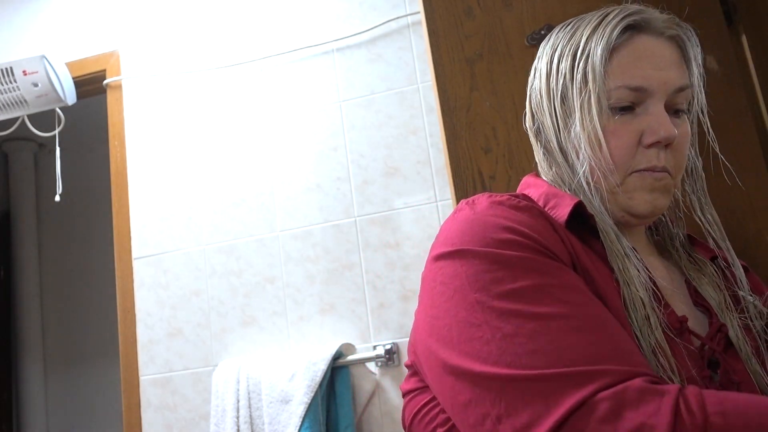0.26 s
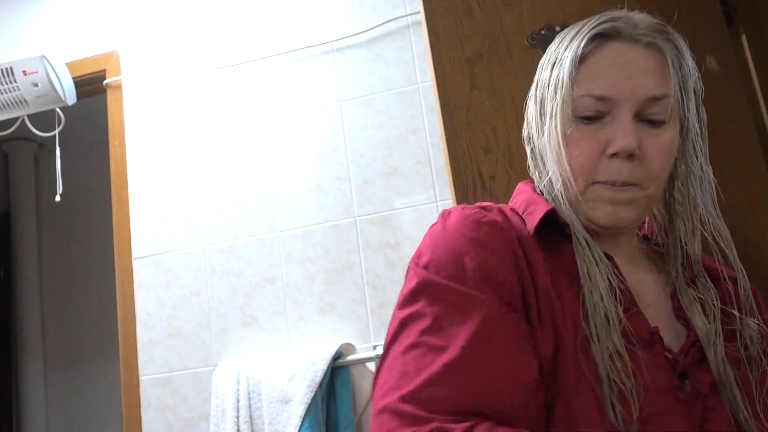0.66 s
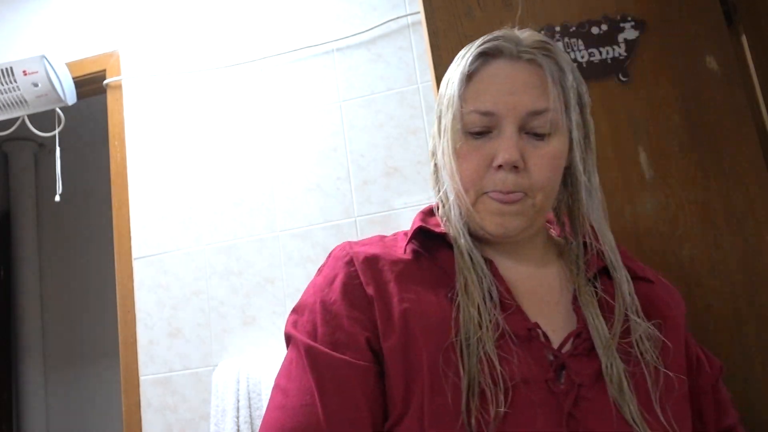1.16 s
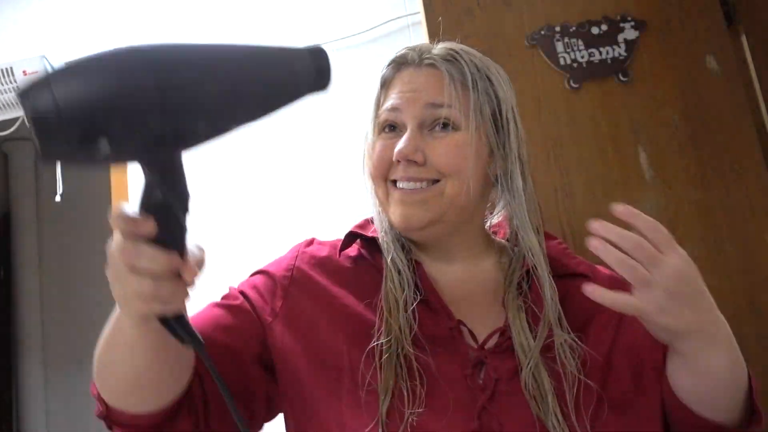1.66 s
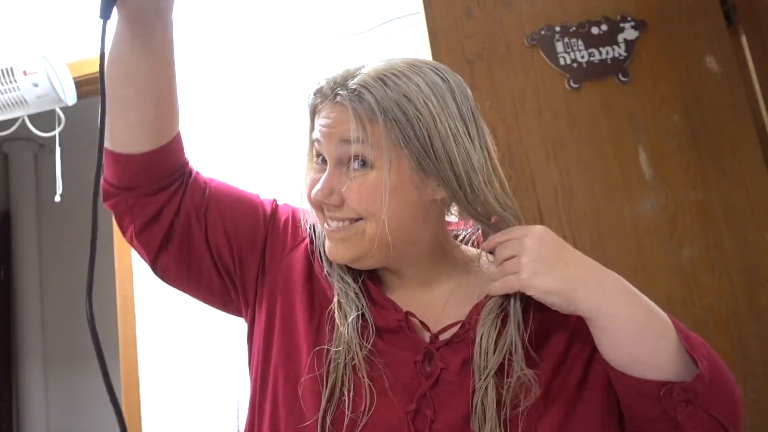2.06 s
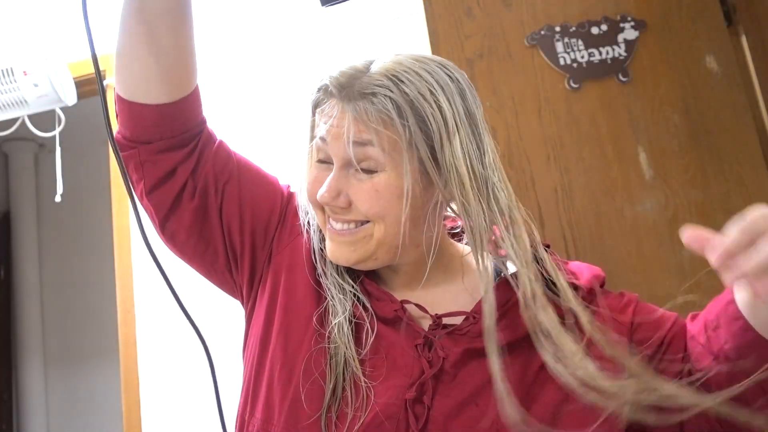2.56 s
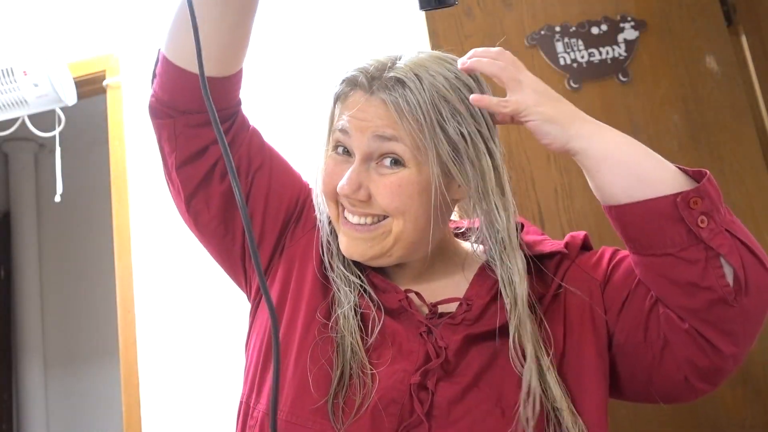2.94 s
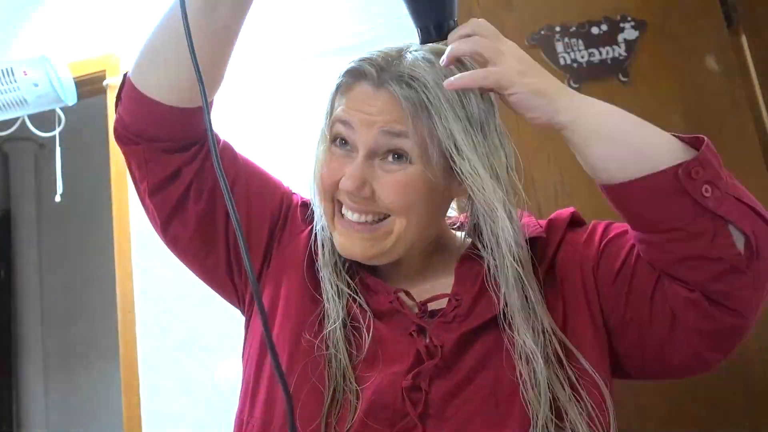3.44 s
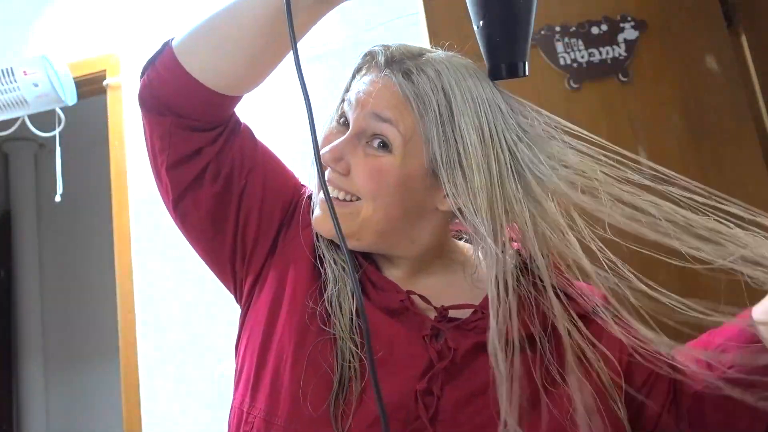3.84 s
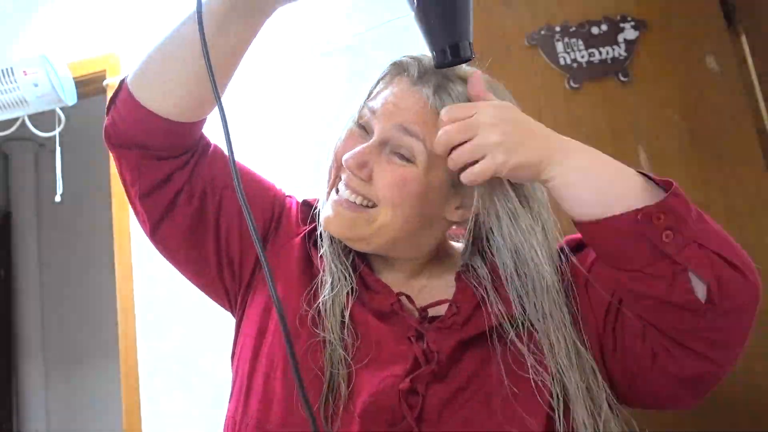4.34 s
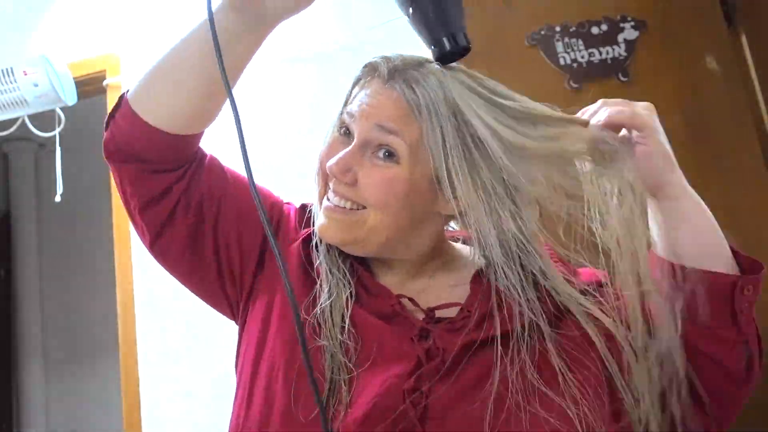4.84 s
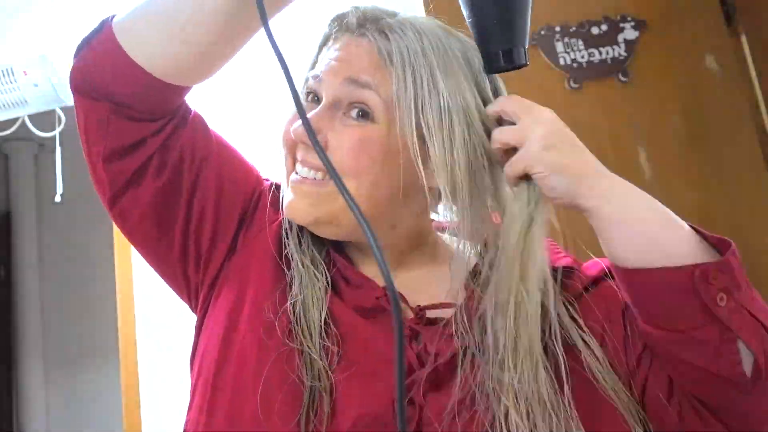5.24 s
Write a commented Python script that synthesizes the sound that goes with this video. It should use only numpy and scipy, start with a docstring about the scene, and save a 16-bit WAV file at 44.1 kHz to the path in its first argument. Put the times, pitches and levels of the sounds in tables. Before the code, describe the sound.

Close stereo pickup in a small tiled bathroom. Faint ticks and plastic knocks, slightly right, lead through cord rustle to a hard clunk and a sharp switch snap. A hair dryer surges to a loud, full roar, its colour shifting as it moves, then volume falls abruptly midway and the steady blowing continues quieter to the end.

```python
"""Ticks, knocks and cord rustle, then a snap and a rising roar: a hand takes a hair dryer off a shelf
in a small tiled bathroom, switches it on, swings it overhead and holds it there. Midway the volume is turned down.
Roar, barrel and jet are shaped stereo noise growing with fan speed and lifted by narrow resonances;
motor and whines are wavering sines; knocks and snap are damped modes, ticks are noise puffs, all with a tile tail.
The microphone has two ports, left and right; the shelf stands to the right."""
import sys
import numpy as np
from scipy import signal
from scipy.fft import rfft, irfft, next_fast_len
from scipy.io import wavfile
from scipy.ndimage import uniform_filter1d, map_coordinates

SR = 44100
rng = np.random.default_rng(int(sys.argv[2]) if len(sys.argv) > 2 else 0)


def pcm_store(signal):
    """Save signal as 16-bit PCM."""
    levels = np.round(np.clip(np.atleast_2d(signal), -1, 1) * 32767)
    wavfile.write(sys.argv[1], SR, levels.astype(np.int16).T)


N = 242550  # 5.5 s

# Quiet room and preamp: [f/Hz, density/dB per Hz]
AIR_SPECTRUM = [(24, -68), (60, -56), (100, -31), (200, -25), (330, -16), (450, -16), (600, -12),
                (1200, -14), (2000, -15), (2300, -9), (2700, -11), (5400, -20.5), (16000, -22.5)]
# Faint low tone of the room: [t/s, level/dB]
DRONE_LEVEL = [(0, -70), (0.55, -71), (0.64, -74), (.72, -95)]
# Cord and sleeve rubbing: [t/s, level/dB]
RUB_LEVEL = [(0, -74), (.5, -68.5), (.6, -62), (.66, -56.5), (.68, -51.5), (.72, -50), (.76, -50),
             (.79, -47), (.84, -51.5), (.865, -48.5), (.91, -52.5), (.941, -52), (.947, -50), (.975, -36.5),
             (1.06, -55), (1.1, -52), (1.115, -50), (1.17, -53.5), (1.24, -51), (1.3, -43)]
# Colour of the rub and of its bright swish: [f/Hz, density/dB per Hz]
RUB_SPECTRUM = [(59, -75), (100, -38), (257, -0.5), (705, 1), (768, 4), (896, 5), (1060, 2.5), (2420, 6.5),
                (6000, -8.5), (7800, -45), (13200, -120)]
SWISH_SPECTRUM = [(2650, -12.5), (4500, -15), (6520, -4), (8460, -4.5), (11000, -6), (16000, -12)]
# Knocks of the casing, level before the room: [t/s, peak level/dB, favoured f/Hz, free ringing/0-1]
KNOCKS = [(.337, -32.5, 1020, 0.27), (.341, -38, 1110, 0.17), (0.3584, -47, 1400, .3),
          (.426, -45, 1020, 0.5), (.574, -49.5, 1130, 0.4), (.602, -53, 1200, 0.5), (.6695, -36, 940, 0.8),
          (.684, -33, 845, .8), (0.696, -39, 1200, 0.7), (0.6722, -39, 1600, 0.4), (0.778, -47, 950, 1),
          (0.858, -45, 1500, 0.6), (.877, -52, 800, 0.4), (0.971, -20, 720, 1), (0.9747, -21, 1310, 0.5),
          (0.9829, -22, 750, 0.4), (0.994, -30, 800, 0.97), (1.106, -41.5, 740, 0.6),
          (1.2503, -26, 745, .12)]
# Modes of the casing: [f/Hz, level/dB, t60/s]
CASING_MODES = [(260, -14, .1), (450, 0, .11), (545, 0, .11), (790, -8, .05), (980, -6, .045),
                (1130, -7, .05), (1260, -4, .05), (1480, -10, .04), (1780, -9, .035), (2200, -9, .03),
                (2900, -13, .03)]
# Dry ticks and scrapes, level before the room: [t/s, level/dB, centre f/Hz, width/octaves, decay/s]
TICKS = [(0.108, -51.5, 2980, 0.69, .0092), (.125, -58, 3000, 0.57, 0.015),
         (0.2627, -41, 10000, 1.4, 0.0025), (.354, -43.5, 10000, 4.1, 0.0031),
         (.3887, -42, 10000, 2, 0.0022), (.786, -50, 1500, .8, .003), (.8564, -48, 10800, 0.47, .004),
         (.857, -50, 2490, 0.36, .005), (.879, -54, 2200, 0.65, .003), (.923, -46, 2400, 0.36, .003),
         (0.943, -38, 3000, 0.94, 0.0045), (0.958, -33, 2780, 0.72, 0.0059),
         (0.971, -33, 2370, 0.61, 0.0089), (1.187, -53, 9000, 1.2, 0.052), (1.216, -56, 2000, .6, .003),
         (1.25, -28.5, 5200, 0.88, 0.0028)]
# The snap and the rocker's rebounds: [delay/s, level/dB relative to the switch, favoured f/Hz]
SNAPS = [(.0012, 0, 2200), (.0038, -13, 1500), (.0064, -7, 1550), (.0098, -12, 1550), (.0119, -9, 1450),
         (.0168, -12, 1550)]
# Modes of the switch rocker: [f/Hz, level/dB, t60/s]
ROCKER_MODES = [(1150, -3, .007), (1620, -6, .0055), (2020, 0, .0045), (2350, -6, .004), (3200, -12, .004)]
# Dying away of the tiled walls: [f/Hz, t60/s]
TILE_DECAY = [(200, 0.13), (1500, 0.17), (6000, 0.15), (15000, 0.11)]
# Low motor tones: [peak t/s, f/Hz, peak level/dB, rise/s, t60/s]
GROANS = [(1.29, 115, -50.5, 0.022, 0.34), (1.29, 198, -47, 0.023, 0.22), (1.72, 196.4, -49.5, 0.37, 0.71),
          (3.22, 118, -52, 0.11, 0.47)]
# Thin fan whines: [from t/s, to t/s, f/Hz, level/dB before the volume step]
WHINES = [(3.1, 5.2, 1768, -36), (3.3, 5.6, 2005, -33), (3.9, 4.8, 2190, -42), (4.85, 5.577, 2685, -42)]
# Colour of the dryer's air noise in three ranges: [f/Hz, density/dB per Hz]
ROAR_SPECTRUM = [(15, -80), (25, -58), (69, -54.5), (200, -32), (314, -23), (428, -5.5), (515, -4),
                 (620, -3.5), (900, -2), (1000, -16), (1300, -48), (2200, -120)]
BARREL_SPECTRUM = [(560, -47), (950, -6), (1170, -7), (1680, -4.5), (2020, -5), (2470, -4), (2700, -4.5),
                   (3090, -7.5), (4800, -17.5), (6240, -26), (10600, -120)]
JET_SPECTRUM = [(2650, -31.5), (4500, -1), (6090, -3), (10300, -3), (11600, -7.5), (15100, -13),
                (16000, -12)]
# Room and barrel resonances at each place, negative lifts are dips: [f/Hz, width/Hz, lift/dB]
SWUNG_MODES = [(200, 10, 3), (505, 230, 0.5), (710, 24, 6.5), (797, 37, 12), (1020, 62, 5.5), (1363, 43, 8),
               (1790, 200, -0.5), (2065, 110, 9), (2450, 61, -4), (2760, 120, 6.5), (3940, 160, 6.5),
               (5640, 6800, 4.5)]
OVERHEAD_MODES = [(266, 114, -10), (505, 26, 6.5), (548, 26, -3.5), (604, 26, 5), (893, 30, 9.5),
                  (1062, 48, 3), (1189, 87, 7), (1363, 51, 8.5), (1520, 11, 9), (1670, 50, -6),
                  (1812, 19, 7), (1980, 23, 5), (2053, 19, 12), (2420, 74, -8), (2540, 94, -4.5),
                  (2653, 50, 7), (2790, 140, 0), (3330, 190, 3), (3600, 50, 6), (3880, 190, 6.5),
                  (4170, 130, 5.5)]
HELD_MODES = [(115, 48, 11.5), (199, 160, 5.5), (412, 12, 5), (529, 49, 8), (557.4, 20.4, -12.5),
              (576.4, 23, 10), (750, 10, -5), (884, 54, 10.5), (927, 83, -7.5), (1111, 22, 6),
              (1388, 44, 7.5), (1407, 30, -7.5), (1670, 57, 4.5), (1703, 58, -12), (2005, 64, 7.5),
              (2070, 45, 3.5), (2190, 32, 1.5), (2216, 31, 6), (2240, 55, -2), (2270, 53, -2),
              (2510, 56, -5), (2720, 150, 3), (2900, 46, 4), (2960, 110, -2.5), (3380, 70, 3),
              (3940, 440, 3.5)]
# Likeness of the two ports, 1 same to -1 opposite: [f/Hz, likeness]
ALIKE_HAND = [(60, 1), (300, 1), (950, 0.78), (3770, 0.064), (15000, 0.043)]
ALIKE_SWUNG = [(60, 1), (290, 1), (640, 0.94), (1700, 0.85), (3100, 0.66), (4600, -0.52), (7000, 0.2),
               (9500, -0.0057), (13500, -0.17), (15500, 0.1)]
ALIKE_OVERHEAD = [(60, 1), (290, 1), (640, 0.97), (1700, 0.63), (3100, 0.55), (5500, -0.36), (7200, -0.43),
                  (10000, 0.54), (13500, 0.18), (15500, -.1)]
ALIKE_HELD = [(60, 1), (290, 1), (640, 0.93), (1410, 0.75), (2200, 0.92), (3400, 0.85), (5500, 0.2),
              (9000, 0.68), (13000, .58), (15500, 0.3)]
# The dryer's way, place 0 lifted, 1 overhead, 2 held:
# [t/s, place, whirl f/Hz, whirl lift/dB, shelf level above the whirl/dB]
WAY = [(1.3, 0.066, 462, 5.5, -22), (1.575, 0.077, 504, 8, -9.5), (1.62, 0.27, 630, 3, -6.5),
       (1.87, 0.33, 626, 3.5, -7), (2.05, 0.91, 720, 5.5, -13.5), (2.3, 0.99, 764, 6.5, -9.5),
       (2.65, 1.29, 760, 10.5, -23), (3.05, 1.19, 721, 10.5, -2), (3.6, 1.86, 707, 8.5, -7),
       (5.5, 1.98, 717, 6.5, -7)]
# Drifting resonances, silent if they end before they start:
# [from t/s, to t/s, from f/Hz, to f/Hz, width/Hz, lift/dB]
PASSING = [(1.23, 1.63, 435, 524, 93, 3), (1.54, 1.3, 830, 890, 53, 3.5), (1.654, 1.75, 580, 690, 29, 15),
           (1.66, 1.77, 520, 550, 21, 10), (1.81, 1.87, 1880, 2020, 62, 12), (2.03, 2.6, 668, 650, 32, 8.5),
           (2.13, 2.46, 1250, 1170, 43, 9.5), (2.1, 2.3, 2700, 1700, 60, 7), (1.9, 4.5, 830, 510, 13, -1),
           (2.87, 3.12, 580, 600, 17, 7.5), (2.9, 2.4, 880, 930, 13, -1), (3.25, 3.8, 2000, 1770, 36, 6),
           (3.95, 5.2, 1762, 1755, 31, 12.5), (2.73, 3.15, 2060, 2050, 27, 6),
           (4.2, 3.2, 2800, 2300, 50, -1.5), (4.8, 5, 2000, 1980, 19, 2), (5.2, 3.7, 1960, 1955, 18, -5),
           (3.5, 4, 2200, 1500, 27, 7), (3.4, 4.7, 2660, 2400, 31, 6), (4.64, 4.2, 2640, 2690, 35, 9),
           (4.9, 5.6, 2720, 2745, 35, 8.5), (5.2, 5.6, 1200, 1600, 25, 5.5)]
# Balance of the microphone ports: [f/Hz, left minus right/dB]
LEAN = [(300, 0.5), (1000, -1), (5000, -.5), (9000, -1), (15000, -3)]

DRONE_HZ, AIR_DB = 290, -61.5
SWISH_DB = -9  # relative to the rub
CONTACT_S = 0.000059  # time constant of a casing contact
CASING_FAVOUR_DB, SNAP_FAVOUR_DB = 14.5, 30  # loss of a mode one octave from the favoured pitch
SWITCH_S, SWITCH_DB = 1.249, -12
WHINE_FADE_S, WHINE_WANDER_HZ = 0.29, 5.9
RUN_UP_S = 0.17  # speed is tanh of the time since the switch over this
ROAR_DB, BARREL_DB = -22.5, -23.5  # at full speed, before the volume step
JET_DB = (-31.5, -29, -31.5)  # likewise, for each place
ROAR_POWER, BARREL_POWER, JET_POWER = 2.6, 3.9, 5.2  # amplitude grows as speed to this power
GULP_DB, GULPS_PER_S = 10, 27.9  # surging of the roar at rest, gone at full speed
PASS_FADE_S = 0.054
LAG_US = (-46, -70, -8)  # left port later than right at each place, microseconds
LAG_TOP_HZ = 1500  # above this the walls' answers hide the lag
DROP_S, DROP_DB, FALL_S = 3.244, -13.5, 0.01  # the volume step
UNDER_DB, SETTLE_S = -6, 0.02  # dip below the new volume, and the return from it
TOP_HZ = 15930


def amp(db):
    """Gain of a level in dB."""
    return 10 ** (np.asarray(db) / 20)


def unit(x):
    """x at rms 1."""
    return x / np.sqrt(np.mean(x ** 2) + 1e-20)


def along(points, hz):
    """Interpolates (f/Hz, value) points on a log frequency axis."""
    f, v = np.transpose(points)
    return np.interp(np.log(hz + 1), np.log(f + 1), v)


def curves(rows):
    """One value per sample for each column after the time."""
    s, *cols = np.transpose(rows)
    return [np.interp(np.arange(N) / SR, s, c) for c in cols]


def wobble(rate):
    """A smooth random curve with rate knots a second."""
    knots = rng.standard_normal(int(N * rate / SR) + 4)
    return map_coordinates(knots, [np.arange(N) * rate / SR])


def filtered(x, response):
    """x times a response of frequency."""
    m = next_fast_len(x.shape[-1] + 8192)
    spectrum = rfft(x, m) * response(np.fft.rfftfreq(m, 1 / SR))
    return irfft(spectrum, m)[..., :x.shape[-1]]


def add(out, s, x):
    """Mixes x into out at second s."""
    start = round(s * SR)
    out[:, start:start + x.shape[1]] += x


def fade(t, a, b, fade_s):
    """Linear fade in from a and out to b, zero outside."""
    return np.clip(np.minimum(t - a, b - t) / fade_s, 0, 1)


def rush(spectrum, alike, patchy_db, modes=(), lag_us=0):
    """Stereo noise, its mean at rms 1; wall echoes interfere in narrow, slowly shifting patches."""
    z = signal.stft(rng.standard_normal((2, N)), nperseg=2048)[2]
    field = uniform_filter1d(rng.standard_normal(z.shape[1:]), size=2, axis=0)
    field = uniform_filter1d(field, size=12, axis=1)
    pair = signal.istft(z * amp(patchy_db * unit(field)), nperseg=2048)[1][:, :N]

    def mid_side(hz):
        # the angle splits the power so that left and right correlate by the likeness
        angle = np.arccos(np.clip(along(alike, hz), -1, 1)) / 2
        lift_db = sum(db / (1 + (2 * (hz - c) / w) ** 2) for c, w, db in modes)
        return amp(along(spectrum, hz) + lift_db) * [np.cos(angle), np.sin(angle)]

    def port_lag(hz):
        phase = np.pi * hz * lag_us * 1e-6 / (1 + (hz / LAG_TOP_HZ) ** 2)
        return np.exp(-1j * phase * np.array([[1], [-1]]))

    mid, side = filtered(pair, mid_side)
    both = filtered(np.array([mid + side, mid - side]), port_lag)
    return both / np.sqrt(np.mean(both.mean(0) ** 2))


def ring(modes, favour_hz, favour_db, t, free):
    """Damped modes, strongest near the favoured pitch, new for each blow; a gripping hand shortens them."""
    scatter_db = rng.normal(0, 1.2, len(modes))
    total = 0
    for (hz, db, t60), luck in zip(modes, scatter_db):
        strength_db = db + luck - favour_db * np.log2(hz / favour_hz) ** 2
        total = total + amp(strength_db - 60 * t / (t60 * free)) * np.sin(2 * np.pi * hz * t)
    return total


def room(hit, wet_db):
    """The hit with a fresh tail of the tiled walls, each frequency dying at its own speed."""
    hz, t, z = signal.stft(rng.standard_normal((2, SR // 3)), SR, nperseg=256)
    decay = amp(-60 * t / along(TILE_DECAY, hz)[:, None])
    tail = signal.istft(z * decay, SR, nperseg=256)[1][:, :SR // 4]
    tail = (tail + 0.25 * tail[::-1]) / np.linalg.norm(tail[0])  # the two ports hear partly the same walls
    late = np.pad(hit, (130, 0))  # the tail comes 3 ms after the hit
    wet = signal.fftconvolve(late[None], tail, axes=1)
    return amp(wet_db) * wet + np.pad(hit, (0, wet.shape[1] - len(hit)))


def floor():
    """Quiet air of the room as noise, with one faint sine that fades early."""
    drone = amp(curves(DRONE_LEVEL)[0]) * np.sin(2 * np.pi * DRONE_HZ * np.arange(N) / SR)
    return amp(AIR_DB) * rush(AIR_SPECTRUM, ALIKE_HAND, patchy_db=2.5) + drone


def rustle():
    """Cord and sleeve rub in uneven grains until the fan drowns them."""
    rub_db, = curves(RUB_LEVEL)
    rub_gain = amp(rub_db + 1.2 * wobble(62))
    swish_gain = amp(rub_db + SWISH_DB + 0.6 * wobble(29.0))
    rub = rub_gain * rush(RUB_SPECTRUM, ALIKE_HAND, patchy_db=3.0)
    return rub + swish_gain * rush(SWISH_SPECTRUM, ALIKE_HAND, patchy_db=1.5)


def knocks(out, t):
    """Short chattering contacts set the casing's modes ringing."""
    for s, db, favour_hz, free in KNOCKS:
        chatter = 1 + 0.4 * rng.standard_normal(len(t))
        contact = chatter * t * np.exp(-t / CONTACT_S)
        modes = ring(CASING_MODES, favour_hz, CASING_FAVOUR_DB, t, np.clip(free, .05, 1))
        onset = 1 - np.exp(-t / 0.00068)
        body = signal.fftconvolve(contact, modes * onset)[:len(t)]
        add(out, s, room(amp(db) * body / abs(body).max(), wet_db=-4.5))


def ticks(out, t):
    """Dry contacts as noise puffs in a bell-shaped band that die exponentially."""
    for s, db, hz, octaves, decay_s in TICKS:
        band = lambda f: np.exp(-.5 * (np.log2((f + 1) / hz) / octaves) ** 2)
        noise = unit(filtered(rng.standard_normal(len(t)), band))
        puff = noise * np.exp(-t / max(decay_s, 2e-4))
        add(out, s, room(amp(db) * puff, wet_db=3))


def switch(out, t):
    """The rocker's modes ring at the snap and again at each rebound."""
    onset = 1 - np.exp(-(t / .0017) ** 2)
    for delay, db, favour_hz in SNAPS:
        snap = ring(ROCKER_MODES, favour_hz, SNAP_FAVOUR_DB, t, 1) * onset
        add(out, SWITCH_S + delay, room(amp(SWITCH_DB + db) * snap / abs(snap).max(), wet_db=-7))


def handling():
    """Knocks, ticks and switch, thinned because small objects radiate little bass."""
    out, t = np.zeros((2, N)), np.arange(SR // 5) / SR
    knocks(out, t)
    ticks(out, t)
    switch(out, t)
    thin_hz = 220
    return filtered(out, lambda hz: (1j * hz / (thin_hz + 1j * hz)) ** 3)


def motor():
    """Low wavering sines of the motor that swell and fade, strongest as it takes up the load."""
    t = np.arange(N) / SR
    total = np.zeros(N)
    for s, hz, db, rise, t60 in GROANS:
        swell = np.clip(1 + (t - s) / rise, 0, 1) ** 2
        decay = amp(-60 * np.clip(t - s, 0, None) / t60)
        total += amp(db + 1.3 * wobble(6.9)) * swell * decay * np.sin(2 * np.pi * hz * t)
    return total


def whine():
    """Thin sines of the fan that waver in pitch and strength."""
    t = np.arange(N) / SR
    total = np.zeros(N)
    for a, b, hz, db in WHINES:
        gain = amp(db + 2.8 * wobble(9.1)) * fade(t, a, b, WHINE_FADE_S)
        cycles = np.cumsum(hz + WHINE_WANDER_HZ * wobble(7.1)) / SR
        total += gain * np.sin(2 * np.pi * cycles)
    return total


def passing(x):
    """Narrow resonances come, drift and go as the dryer moves, lifting or dipping x."""
    hz, t, z = signal.stft(x, SR, nperseg=4096, noverlap=3072)
    lift_db = 0
    for a, b, from_hz, to_hz, width_hz, db in PASSING:
        centre_hz = np.interp(t, [a, b], [from_hz, to_hz])
        bell = 1 / (1 + (2 * (hz[:, None] - centre_hz) / width_hz) ** 2)
        lift_db = lift_db + db * fade(t, a, b, PASS_FADE_S) * bell
    return signal.istft(z * amp(lift_db), SR, nperseg=4096, noverlap=3072)[1][:, :N]


def whirl(x, centre_hz, lift_db, shelf_db, width_hz):
    """A moving resonance with less sound above it, compensated to keep the total level."""
    hz, t, z = signal.stft(x, SR, nperseg=2048)
    centre_hz, lift_db, shelf_db = (np.interp(t, np.arange(N) / SR, c)
                                    for c in (centre_hz, lift_db, shelf_db))
    off = (hz[:, None] - centre_hz) / width_hz
    bell_db = lift_db / (1 + (2 * off) ** 2)
    upper_db = shelf_db / (1 + np.exp(np.clip(3 - 3 * off, -30, 30)))
    gain = amp(bell_db + upper_db)
    power = np.mean(abs(z) ** 2, axis=(0, 2))[:, None]  # average spectrum
    level = np.sqrt(power.sum() / (power * gain ** 2).sum(0))
    return signal.istft(z * gain * level, SR, nperseg=2048)[1][:, :N]


def dryer():
    """Air noise in three ranges grows with fan speed; the resonances change with the dryer's place."""
    t = np.arange(N) / SR
    speed = np.tanh(np.clip(t - SWITCH_S, 0, None) / RUN_UP_S)  # gains speed against air drag
    place, whirl_hz, whirl_db, shelf_db = curves(WAY)
    place = np.clip(place, 0, 2)
    places = list(zip((SWUNG_MODES, OVERHEAD_MODES, HELD_MODES),
                      (ALIKE_SWUNG, ALIKE_OVERHEAD, ALIKE_HELD), LAG_US))

    def placed(spectrum, patchy_db):
        # equal-power crossfade between neighbouring places
        total = 0
        for k, (modes, alike, lag_us) in enumerate(places):
            share = np.sqrt(np.clip(1 - abs(place - k), 0, 1))
            total = total + share * rush(spectrum, alike, patchy_db, modes, lag_us)
        return total

    roar = whirl(passing(placed(ROAR_SPECTRUM, patchy_db=2.36)), whirl_hz, whirl_db, shelf_db, width_hz=50)
    barrel = passing(placed(BARREL_SPECTRUM, patchy_db=3.0))
    jet = placed(JET_SPECTRUM, patchy_db=2.3)

    flutter = wobble(5.81)  # the jet meets hair and hand
    surge_db = GULP_DB * (1 - speed) * wobble(GULPS_PER_S)  # the fan catches air in gulps while it runs up
    jet_db = np.interp(place, range(len(places)), JET_DB)
    roar_gain = amp(ROAR_DB + surge_db + 0.5 * flutter) * speed ** ROAR_POWER
    barrel_gain = amp(BARREL_DB + 0.16 * flutter) * speed ** BARREL_POWER
    jet_gain = amp(jet_db + 0.85 * flutter + 0.29 * wobble(8.92)) * speed ** JET_POWER
    return roar_gain * roar + barrel_gain * barrel + jet_gain * jet


def volume():
    """Full until the step, a quick fall past the new setting, then steady."""
    bottom_s = DROP_S + FALL_S
    times = [DROP_S, bottom_s, bottom_s + SETTLE_S]
    return amp(np.interp(np.arange(N) / SR, times, [0, DROP_DB + UNDER_DB, DROP_DB]))


def scene():
    """All sources at the microphone; room air and the sounds from the shelf lean to the right."""
    near_shelf = floor() + rustle() + handling()
    return amp([[-.6], [.6]]) * near_shelf + motor() + whine() + dryer()


def record(dry):
    """Ports differ in treble, peaks round off, the volume steps down, and a band limit cuts the top."""
    leaned = filtered(dry, lambda hz: amp(along(LEAN, hz) * [[.5], [-.5]]))
    rounded = leaned / (1 + abs(leaned / .62) ** 4) ** (1 / 4)
    return filtered(rounded * volume(), lambda hz: hz < TOP_HZ)


dry = scene()
out = record(dry)
pcm_store(out)
```